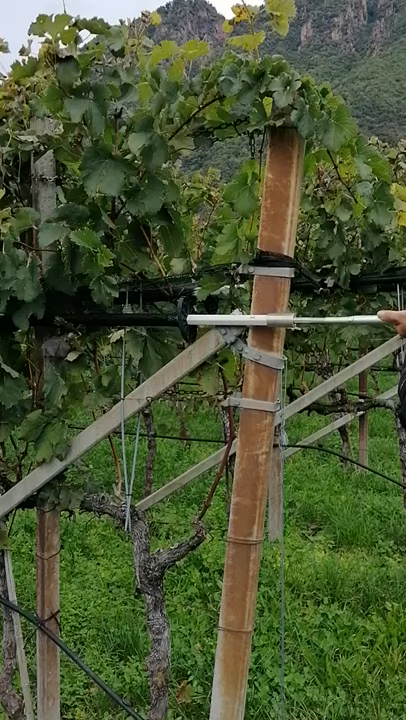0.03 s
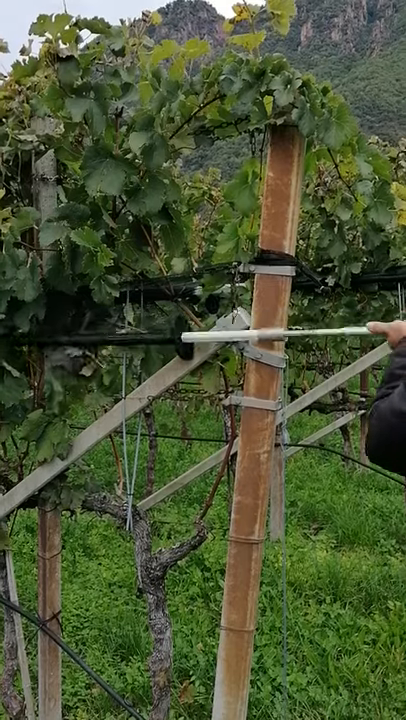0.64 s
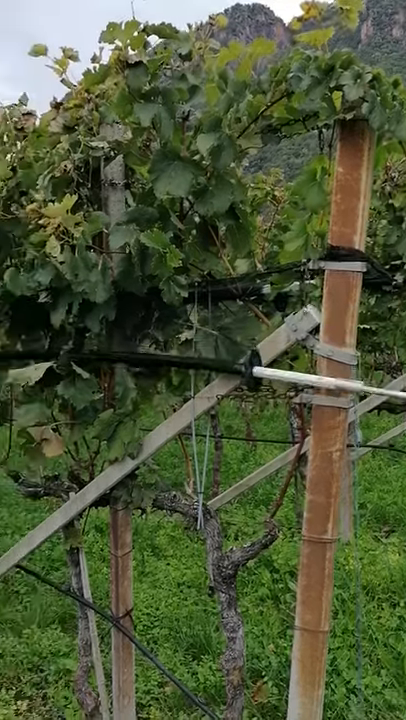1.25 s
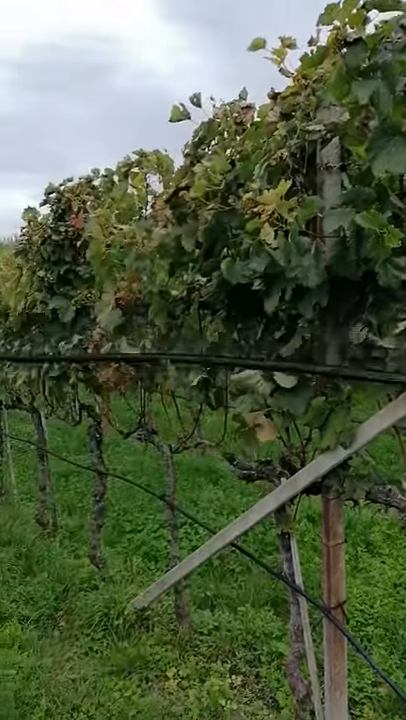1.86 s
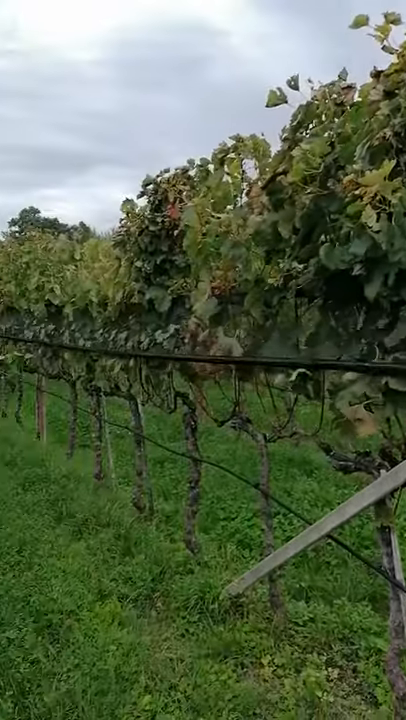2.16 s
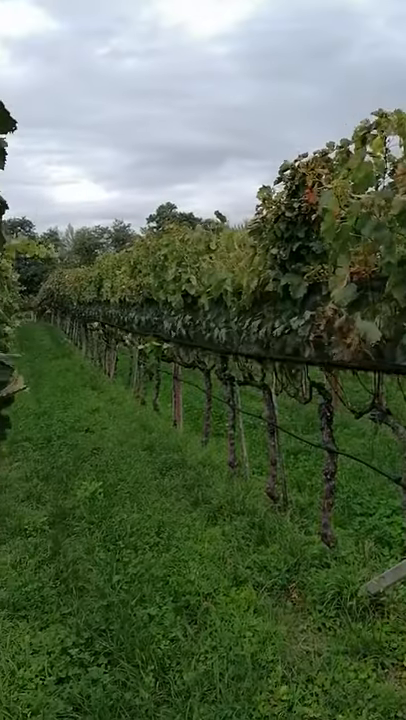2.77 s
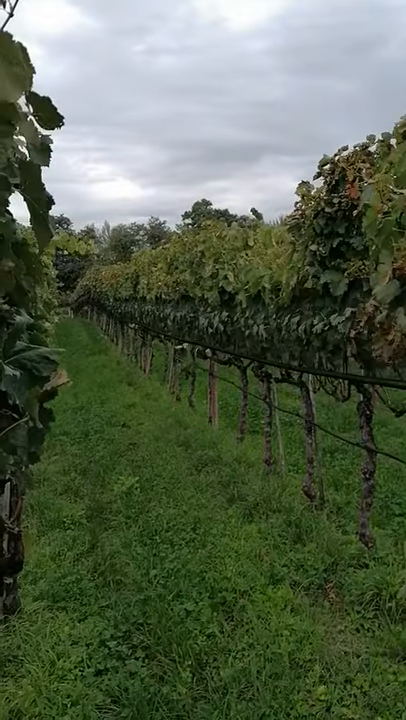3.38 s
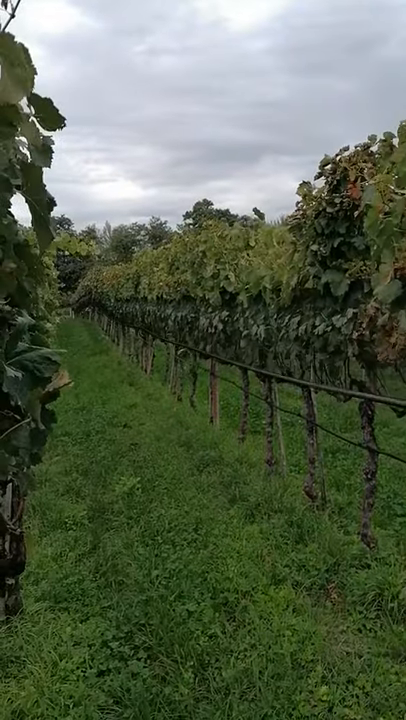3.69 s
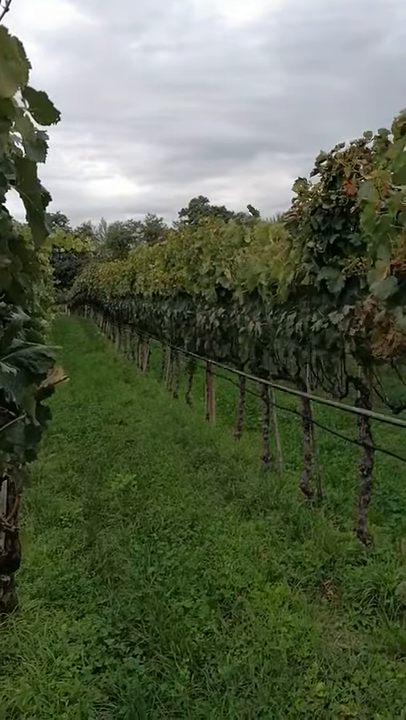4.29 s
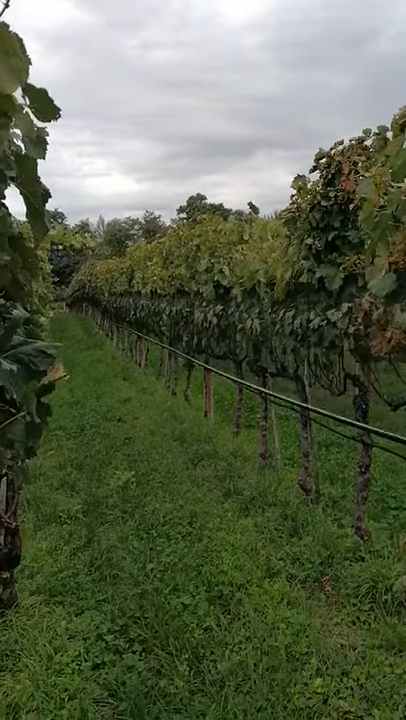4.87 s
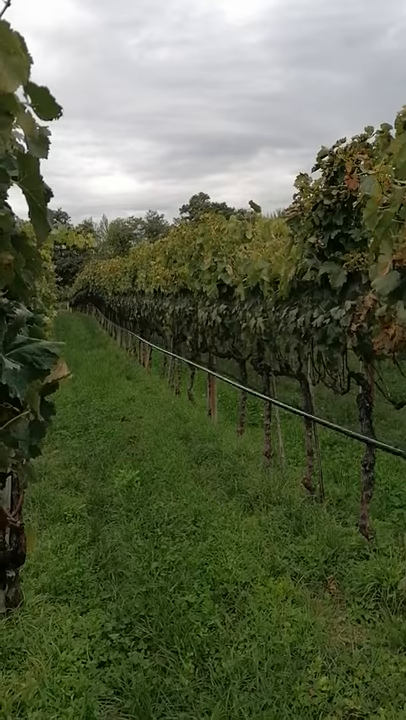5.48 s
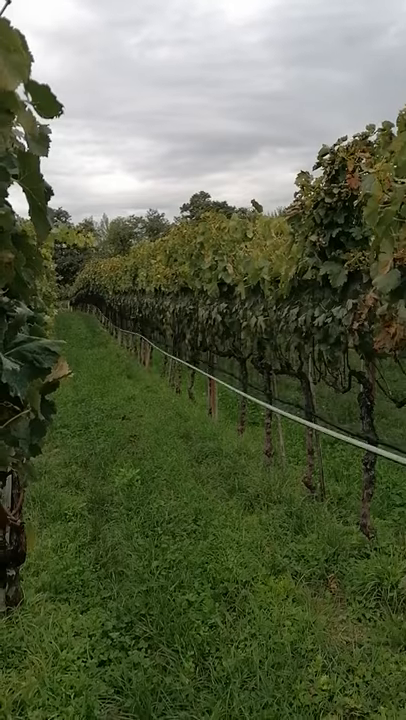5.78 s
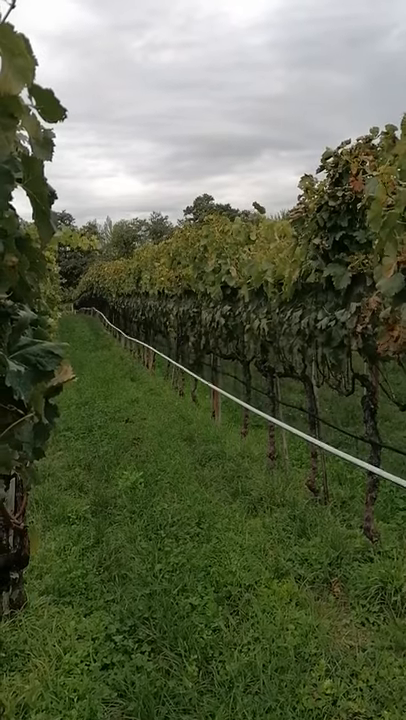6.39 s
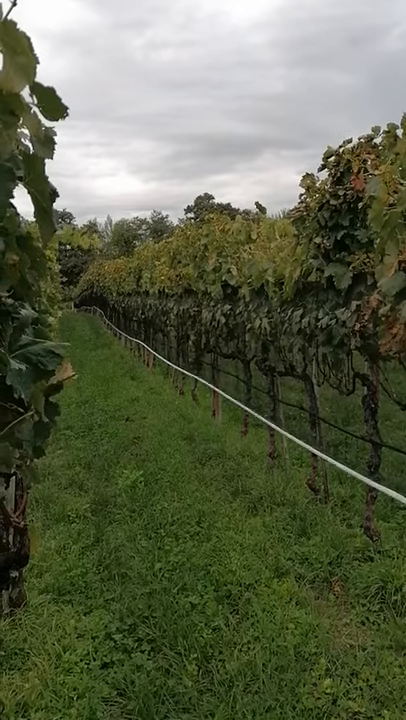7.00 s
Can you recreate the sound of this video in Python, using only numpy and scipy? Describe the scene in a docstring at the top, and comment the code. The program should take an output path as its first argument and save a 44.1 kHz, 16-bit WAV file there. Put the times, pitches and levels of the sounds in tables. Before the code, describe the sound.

Netting unwinds from a long tube along a vine row, slightly right of the microphone, in dry outdoor air. A cluster of chirping squeaks and ticks comes first, followed by close leafy brushing and small stem snaps. The roll's quiet rumble and the rush of mesh then build as the tube speeds up, while its bearings squeak briefly and click on their hooks. Its low hum climbs, then drops as it slows.

```python
"""Net unwinding along a vine row

Outdoors, a protective net runs off a long tube. The tube hums as it spins up and slows again; the roll
rumbles, and the mesh rushes, hisses and rubs the tube's resonances. The bearings squeak by stick-slip
and tick on their hooks. Close by, leaves or a sleeve brush past, and a few stems or twigs snap."""
import sys
import numpy as np
from scipy import signal
from scipy.io import wavfile

SR = 44100
rng = np.random.default_rng(int(sys.argv[2]) if len(sys.argv) > 2 else 0)


def wav_out(sig):
    """Save sig, one row per channel (or a flat mono array), as 16-bit PCM at SR to the path in sys.argv[1]."""
    wavfile.write(sys.argv[1], SR, np.round(np.clip(np.atleast_2d(sig).T, -1, 1) * 32767).astype(np.int16))


N = 310905
TIME = np.arange(N) / SR
SLOW_HZ, CUTOFF_HZ = 50, 15300


def from_db(db):
    """Decibels to gain."""
    return 10 ** (np.asarray(db) / 20)


def rms_one(x):
    """Scale to rms 1."""
    return x / np.sqrt(np.mean(x ** 2) + 1e-20)


def in_time(points):
    """A (time_s, value) curve at every sample."""
    return np.interp(TIME, *np.transpose(points))


def at_hz(points, hz):
    """A (freq_hz, value) curve read on a log-frequency axis."""
    freqs_hz, values = np.transpose(points)
    return np.interp(np.log(hz), np.log(freqs_hz), values)


def bell(crest_s, half_s):
    """Gaussian swell of height 1."""
    return np.exp(-((TIME - crest_s) / half_s) ** 2)


def drift(rate_hz, size=N):
    """Smooth random curve, standard deviation 1."""
    knots = rng.standard_normal(8192)
    return np.interp(np.arange(size) * rate_hz / SR, np.arange(len(knots)), knots) / np.sqrt(2 / 3)


def partial(phase, unsteady, rate_hz):
    """Unit sine, of which the unsteady share shakes at random."""
    share = np.clip(unsteady, 0, 1)
    wobble = (drift(rate_hz, len(phase)) + 1j * drift(rate_hz, len(phase))) / np.sqrt(2)
    return np.imag((np.sqrt(1 - share ** 2) + share * wobble) * np.exp(1j * phase))


def band(x, low_hz, high_hz):
    """Butterworth band-pass."""
    high_hz = np.clip(high_hz, 40, .45 * SR)
    sos = signal.butter(2, [min(low_hz, .9 * high_hz), high_hz], "band", fs=SR, output="sos")
    return signal.sosfilt(sos, x)


def resonance(x, hz, width_hz):
    """Two-pole resonance, peak gain 1."""
    r = np.exp(-np.pi * width_hz / SR)
    feedback = [1, -2 * r * np.cos(2 * np.pi * hz / SR), r * r]
    return signal.lfilter(np.array([1, 0, -1]) * (1 - r * r) / 2, feedback, x)


def panned(x, pan_db):
    """Constant-power pan; pan_db is left minus right."""
    return x * rms_one(from_db(np.array([[pan_db], [-pan_db]]) / 2))


def add(out, start_s, x):
    """Mix in a short stereo sound."""
    at = int(start_s * SR)
    out[:, at:at + x.shape[1]] += x[:, :N - at]


def speed_hz():
    """Tube speed as its hum pitch, per sample."""
    # spin-up and slowdown: time_s, pitch_hz
    speed = [(.9, 47.93), (2.9, 50.69), (3.7, 51.1), (4.42, 56.6), (5.18, 64.42), (5.45, 67.38),
             (6.03, 72.87), (6.39, 72.9), (6.77, 57.7), (7.05, 49.2)]
    return in_time(speed)


def level_db(layer, easy_flow_db=-55):
    """Level of a layer, growing with net flow and tube speed."""
    # how hard the net runs off: time_s, flow_db
    flow = [(0.7, -61), (1.51, -60), (1.78, -55), (3.14, -53.5), (5.09, -49), (5.77, -44.5), (6.16, -43),
            (7.05, -44)]
    # by layer: base_db (easy flow, slow speed), db_per_flow_db, db_per_speed_doubling
    laws = {"fundamental": (-54, 0.38, 5.4), "octave": (-64.5, 0.8, 7.5), "third": (-61.5, 0.22, 2.4),
            "rumble": (-53.5, 0.58, 0.46), "whirr": (-61, 0.99, 0), "rush": (-54.5, 1, 0.6),
            "hiss": (-64.5, 0.26, 9)}
    base_db, per_flow, per_doubling = laws[layer]
    doublings = np.log2(speed_hz() / SLOW_HZ)
    return base_db + per_flow * (in_time(flow) - easy_flow_db) + per_doubling * doublings


def friction(spectrum, patchy_db, grain_db):
    """Countless small uneven slips: stereo noise in flickering half-octave bands, rms 1."""
    # left-right likeness: freq_hz, correlation
    likeness = [(60, 0.87), (400, 0.99), (1000, 0.92), (2000, 0.64), (4000, 0.066), (10000, 0.064)]
    slips = rng.standard_normal((2, 2, N)) * from_db(grain_db * drift(900))
    out, edges_hz = np.zeros((2, N)), 22 * 2 ** np.arange(0, 10, .5)
    for k, (low, high) in enumerate(zip(edges_hz, edges_hz[1:])):
        hz, flicker = np.sqrt(low * high), drift(25)
        if high < spectrum[0][0] or low > spectrum[-1][0]:
            continue
        mid, side = band(slips[k % 2], low, high)
        alike = at_hz(likeness, hz)
        gain = from_db(at_hz(spectrum, hz) + patchy_db * flicker)
        out += gain * (np.sqrt(1 + alike) * mid + np.sqrt(1 - alike) * side * [[1], [-1]])
    return rms_one(out)


def net():
    """The roll rumbles, the mesh rushes off it, its threads hiss."""
    # spectra of roll, mesh and threads: freq_hz, relative_density_db
    roll = [(25, -7), (48, -4), (90, 1), (130, -2.5), (215, -5), (300, -7.5), (450, -14), (900, -38)]
    mesh = [(250, -3), (500, -0.5), (850, 1), (1400, -3), (2100, -7.5), (2900, -4.5), (4000, -19),
            (7000, -23.5)]
    threads = [(2000, 13.5), (3900, 2), (5600, 12), (7600, 1), (9500, 4.5), (13400, -1)]
    rumble = from_db(level_db("rumble")) * friction(roll, patchy_db=2.0, grain_db=2.0)
    rush = from_db(level_db("rush")) * friction(mesh, patchy_db=1.0, grain_db=1.0)
    hiss = from_db(level_db("hiss")) * friction(threads, patchy_db=1.5, grain_db=2.0)
    return panned(rumble, pan_db=-0.5) + panned(rush, pan_db=-2.0) + panned(hiss, pan_db=1.0)


def whirr(climb_oct_per_doubling=.1):
    """The running mesh rubs the tube's resonances, which climb slightly with speed."""
    # tube resonances at slow speed: freq_hz, width_hz, relative_db, db_per_speed_doubling
    modes = [(211.7, 55, 4.5, -2), (818, 130, -11, 4), (1230, 220, -23.5, 42), (1553, 220, -10.5, 13)]
    doublings = np.log2(speed_hz() / SLOW_HZ)
    phase_per_hz = 2 * np.pi * np.cumsum(2 ** (climb_oct_per_doubling * doublings)) / SR
    rings = sum(from_db(db + per_doubling * doublings) * partial(hz * phase_per_hz, 0.99, width_hz)
                for hz, width_hz, db, per_doubling in modes)
    return panned(from_db(level_db("whirr")) * rings, pan_db=-3.5)


def ticks(rise_s=0.0001, stereo_spread=0.97, band_ratio=1.78, crack_db=-13):
    """Dying contact chatter rings a hook's modes, with a faint wide crack."""
    # tube striking its hooks: start_s, level_db, centre_hz, t60_s
    contacts = [ (0.528, -42, 3480, 0.03), (0.845, -41, 6200, 0.021), (0.864, -30, 5700, 0.02),
                (2.128, -46, 3300, 0.076), (3.384, -44.5, 2980, 0.053), (3.934, -47.5, 4930, 0.047),
                (4.139, -41, 3320, 0.038), (4.624, -46, 4500, 0.034), (4.859, -43, 2840, 0.038),
                (5.306, -36.5, 3350, 0.096), (5.522, -36.5, 5600, 0.1)]
    # hook modes: freq_hz, width_hz, gain_db
    hook = [(3020, 240, 9), (5170, 45, 8), (5860, 51, -12)]
    out, t = np.zeros((2, N)), TIME[:SR // 8]
    for start_s, db, centre_hz, t60_s in contacts:
        mid, side = rng.standard_normal((2, len(t)))
        chatter = mid + stereo_spread * side * [[1], [-1]]
        chatter += sum(from_db(gain_db) * resonance(chatter, hz, width) for hz, width, gain_db in hook)
        body = rms_one(band(chatter, centre_hz / band_ratio, centre_hz * band_ratio))
        crack = from_db(crack_db) * rms_one(band(chatter, 2000, 9000))
        envelope = from_db(db - 60 * t / t60_s) * (1 - np.exp(-t / rise_s))
        add(out, start_s, (body + crack) * envelope)
    return out


def brushing(snag_db=2.5, scuff_db=-53.5):
    """Leaves or a sleeve snag and slip in swells of grainy hiss; one dull scuff, perhaps a step."""
    # swells: crest_s, level_db, rise_s, fall_s
    brushes = [(.88, -55.5, 0.19, 0.13), (1.68, -46.5, 0.073, 0.073), (1.79, -51.5, 0.09, 0.14),
               (2.49, -44, 0.059, 0.11)]
    # brush spectrum: freq_hz, relative_density_db
    spectrum = [(300, -32), (600, -17), (1500, -3.5), (3500, -6), (6000, -3.5), (10000, -5.5),
                (13400, -7.5)]
    power = sum(from_db(db) ** 2 * np.exp(-2 * np.maximum((s - TIME) / rise_s, (TIME - s) / fall_s))
                for s, db, rise_s, fall_s in brushes)
    dull_noise = rms_one(resonance(rng.standard_normal(N), hz=563, width_hz=105))
    scuff = from_db(scuff_db) * bell(crest_s=1.773, half_s=0.14) * dull_noise
    snags = from_db(snag_db * drift(76))
    hiss = np.sqrt(power) * snags * friction(spectrum, patchy_db=3.5, grain_db=1.0)
    return panned(hiss + scuff, pan_db=-0.5)


def stick_slip(length_s, crest, first_hz, held_hz, db, octave_db, rough, split_db, pan_db):
    """The pitch settles as the contact grips; roughness shakes each partial and adds a rasp."""
    # partials 3 and 4: level_db relative to the octave
    upper_db = [-9, -12.5]
    glide_s, shake_db, shake_hz = 0.00495, 4.5, 600
    size = int(length_s * SR)
    progress = np.arange(size) / size
    arch = np.sin(np.interp(progress, [0, np.clip(crest, .1, .9), 1], [0, np.pi / 2, np.pi]))
    swell = arch ** max(1, 3 * crest)   # a late crest creeps in softly
    glide_hz = held_hz + (first_hz - held_hz) * np.exp(-TIME[:size] / glide_s)
    hz = glide_hz * (1 + .035 * rough * drift(737, size))
    phase = 2 * np.pi * np.cumsum(hz) / SR
    partials_db = [0, octave_db] + [octave_db + offset_db for offset_db in upper_db]
    tone = sum(from_db(level) * partial(k * phase, rough * k, shake_hz)
               for k, level in enumerate(partials_db, 1) if k * held_hz < CUTOFF_HZ)
    # as the grip loosens, strong and weak slips alternate: split tones between the partials
    for ratio in (1.5, 2.5, 3.5):
        tone += progress * from_db(split_db) / ratio * partial(ratio * phase, 1, shake_hz)
    noise = rng.standard_normal((2, SR // 4))[:, :size]
    rasp = rough ** 2 * from_db(-12) * rms_one(band(noise, 2300, 10000))
    gain = np.sqrt(2) * from_db(db + shake_db * rough * drift(243, size))
    return panned(gain * swell * (tone + rasp), pan_db)


def squeaks():
    """A bearing sings briefly by stick-slip."""
    # bearing slips: start_s, length_s, crest_share, first_hz, held_hz,
    # level_db, octave_db, roughness, split_db, pan_db
    slips = [ (0.605, 0.029, 0.84, 3560, 3660, -30, -15.5, 0.2, -42, 9),
             (0.751, 0.026, 0.4, 2750, 2765, -41.5, -2, 0.15, -0.5, 21),
             (0.862, 0.02, 0, 6150, 5900, -43.5, -24, 0.2, -30, -3),
             (2.883, 0.013, .55, 3300, 3260, -41.5, -16, 0.07, -43, 2),
             (2.976, 0.021, 0.36, 2970, 2966, -34.5, -39, 0, -40, 1),
             (3.252, 0.026, 0.24, 3720, 3558, -25.5, -15, 0.29, -41, 3),
             (3.544, 0.012, 0.3, 3180, 3230, -56, 0, 0.4, -25, 2),
             (3.59, 0.035, 0.2, 3020, 2970, -52, -25, 0.2, -35, 9),
             (4.172, 0.042, 0.48, 3680, 2952, -28, -11.5, 0, -20, 3),
             (4.2, 0.04, 0.15, 3000, 2943, -24.5, -9, 0.16, -13, -3),
             (4.888, 0.026, 0.4, 3450, 3070, -37.5, -36, 0.2, -37, 0),
             (4.912, 0.018, 0.36, 2940, 3092, -29.5, -41, 0.17, -36, 1),
             (4.928, 0.045, 0.2, 2890, 2976, -31, -22, 0.2, -35, -4),
             (5.244, 0.056, 0.38, 3020, 2966, -29, -10.5, 0.13, -21, -3),
             (5.521, 0.021, 0.24, 3040, 2730, -43, 0, 0.92, -8, -3),
             (5.805, 0.023, 0.33, 3510, 2730, -33.5, -1.5, 0.56, -22, -2),
             (5.826, 0.011, 0.5, 2640, 3420, -30, -4, 0.43, -26, 1),
             (5.929, 0.029, 0.27, 2950, 2430, -35, 0, 0.96, -1, 4.5)]
    out = np.zeros((2, N))
    for start_s, *slip in slips:
        add(out, start_s, stick_slip(*slip))
    return out


def squeals(low_hz=2976, flip_share=0.65, upper_gain_db=6.5):
    """As the tube starts, a bearing catches on its low mode and flips to an upper one."""
    # bearing catches: start_s, length_s (each mode), upper_hz, low_mode_db
    catches = [(.725, 0.0062, 5240, -49), (0.743, 0.0088, 5280, -32.5), (0.772, 0.011, 5180, -42),
               (0.785, 0.016, 5150, -35)]
    out = np.zeros((2, N))
    for start_s, length_s, upper_hz, low_db in catches:
        low = (start_s, low_hz, low_db, 1.0)
        upper = (start_s + flip_share * length_s, upper_hz, low_db + upper_gain_db, -6.0)
        for onset_s, hz, db, pan_db in (low, upper):
            squeal = stick_slip(length_s, crest=0.52, first_hz=1.02 * hz, held_hz=hz, db=db,
                                octave_db=-16.5, rough=0.29, split_db=-25, pan_db=pan_db)
            add(out, onset_s, squeal)
    return out


def tube(start_s=.86, rise_s=0.011, waver=0.0041, throb=0.21):
    """The tube hums at a pitch set by its speed, steadier when faster, under two thin whines."""
    # hum swells: crest_s, half_length_s, fundamental_gain_db, octave_gain_db
    swells = [(3.902, 0.66, -1, 8.5), (5.42, 0.11, 9, 4), (5.724, 0.16, -11, 2), (6.036, 0.15, 9, 9.5),
              (6.36, 0.24, 1, 5), (6.96, 0.089, 5, 15)]
    # rising whines: crest_s, half_length_s, crest_pitch_hz, rise_hz_per_s, level_db
    whines = [(5.501, 0.22, 366, 77, -49), (6.65, 0.62, 385, 11, -53.5)]
    hz = speed_hz()
    first_db = level_db("fundamental") + sum(db * bell(s, half_s) for s, half_s, db, _ in swells)
    octave_db = level_db("octave") + sum(db * bell(s, half_s) for s, half_s, _, db in swells)
    phase = 2 * np.pi * np.cumsum(hz) / SR
    unsteady = np.clip(throb * (hz.mean() / hz) ** 4, .1, .7)
    hum = sum(from_db(db) * partial(k * phase, unsteady, rate_hz=20)
              for k, db in enumerate((first_db, octave_db, level_db("third")), 1))
    flutter_db, wander = 2 * drift(22), 1 + waver * drift(30)
    whine = np.zeros(N)
    for crest_s, half_s, crest_hz, rise_hz_per_s, db in whines:
        whine_hz = (crest_hz + rise_hz_per_s * (TIME - crest_s)) * wander
        envelope = from_db(db + flutter_db) * bell(crest_s, half_s)
        whine += envelope * np.sin(2 * np.pi * np.cumsum(whine_hz) / SR)
    turning = np.clip((TIME - start_s) / rise_s, 0, 1)
    return panned(np.sqrt(2) * turning * (hum + whine), pan_db=-3.0)


def snaps(knock_q=3.3, crack_s=.0005, ring_cycles=2.1):
    """A stem or twig snaps: a wide crack, a short woody knock, fibres crackling at the same pitch."""
    # breaking stems: start_s, knock_db, knock_hz, crackle_t60_s, crack_db
    stems = [(1.6773, -31, 1490, 0.036, -34), (1.7248, -29, 2880, 0.043, -46),
             (2.5173, -37.5, 870, 0.026, -17.5)]
    out, t = np.zeros((2, N)), TIME[:SR // 8]
    for start_s, db, hz, t60_s, crack_db in stems:
        fibres, burst = rng.standard_normal((2, len(t)))
        knock = 2 * np.sin(2 * np.pi * hz * t) * np.exp(-t * hz / ring_cycles)
        ringing = resonance(band(fibres, hz / 2, hz * 2), hz, hz / knock_q)
        crackle = rms_one(ringing) * from_db(-60 * t / t60_s)
        crack = rms_one(band(burst, 1000, 11000)) * np.exp(-t / crack_s)
        add(out, start_s, panned(from_db(db) * (knock + crackle) + from_db(crack_db) * crack, 0))
    return out


def vines(x, build_s=0.0024):
    """Leaves, posts and ground add a quick thin tail; the far row a fainter, longer one."""
    # near and far scatter: t60_s, energy_db
    tails = [(.07, -6.5), (.28, -22)]
    t = TIME[:SR // 2]
    power = sum(from_db(db - 60 * t / t60_s) ** 2 / t60_s for t60_s, db in tails)
    envelope = np.sqrt(power * 2 * np.log(1000) / SR) * (1 - np.exp(-t / build_s))
    scatter = rms_one(band(rng.standard_normal((2, len(t))), 380, 9400)) * envelope
    return x + signal.fftconvolve(x, scatter, axes=1)[:, :N]


def scene():
    """The row lies to the right, so the left ear lags by 2 samples; the brushing is close by."""
    left, right = tube() + net() + whirr() + vines(squeaks() + squeals() + ticks() + snaps())
    return np.array([np.pad(left, (2, 0))[:N], right]) + brushing()


def record(dry, open_s=.527, dull_hz=10500, dull_share=0.8):
    """Silence until the microphone opens; two treble dips, a dull top and a steep cutoff."""
    # microphone dips: centre_hz, width_hz, depth_share
    dips = [(4010, 1390, 0.55), (7860, 3000, 0.38)]
    for hz, width_hz, depth in dips:
        dry = dry - depth * resonance(dry, hz, width_hz)
    soft = signal.sosfiltfilt(signal.butter(4, dull_hz, fs=SR, output="sos"), dry)
    dulled = dry + dull_share * (soft - dry)
    opened = np.clip((TIME - open_s) / .002, 0, 1)
    return signal.sosfilt(signal.ellip(10, .2, 80, CUTOFF_HZ, fs=SR, output="sos"), dulled * opened)


dry = scene()
out = record(dry)
wav_out(out)
```